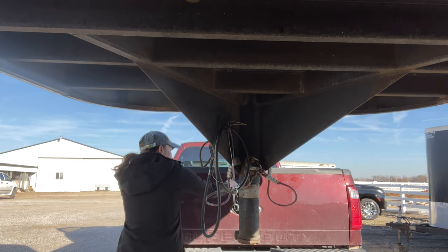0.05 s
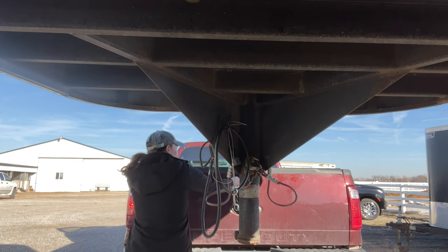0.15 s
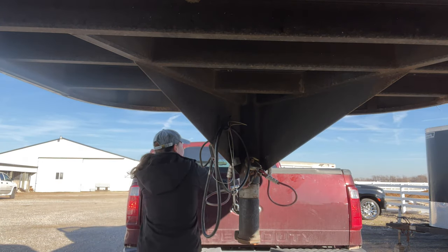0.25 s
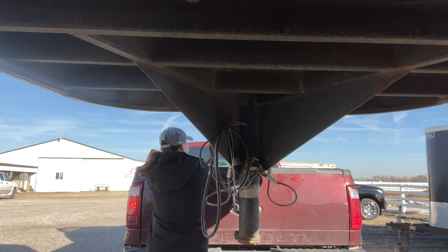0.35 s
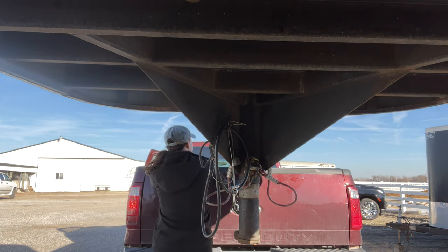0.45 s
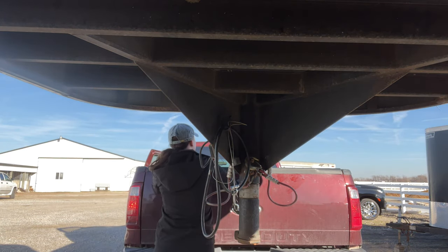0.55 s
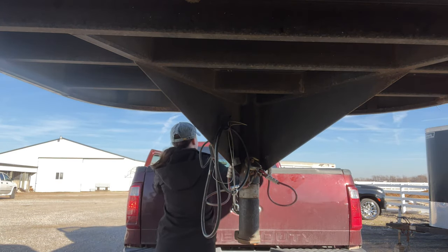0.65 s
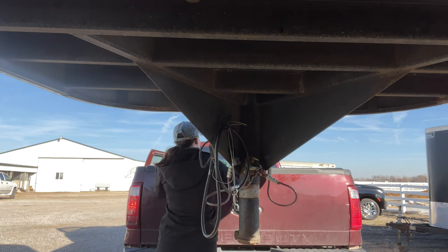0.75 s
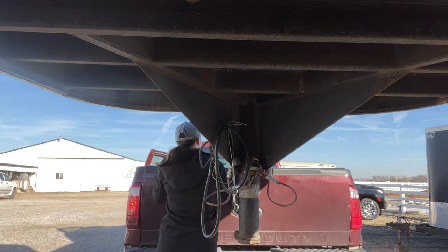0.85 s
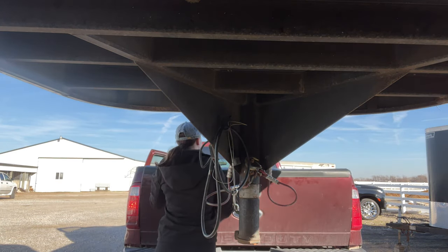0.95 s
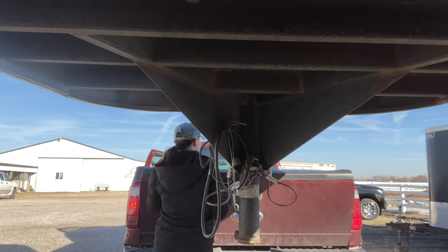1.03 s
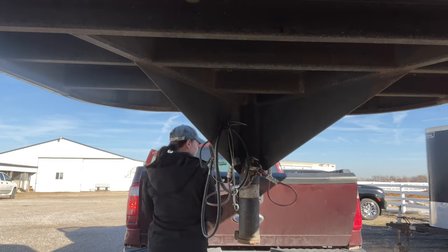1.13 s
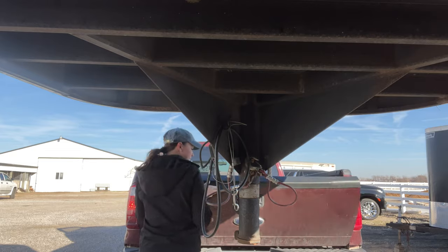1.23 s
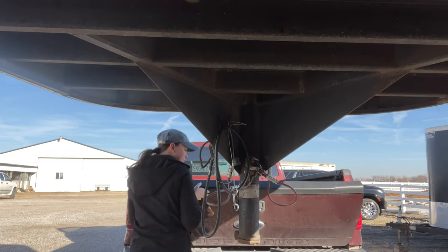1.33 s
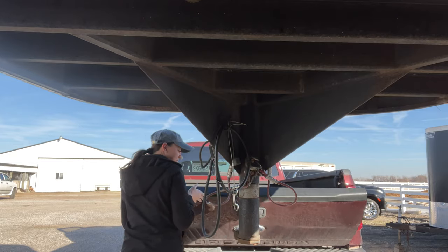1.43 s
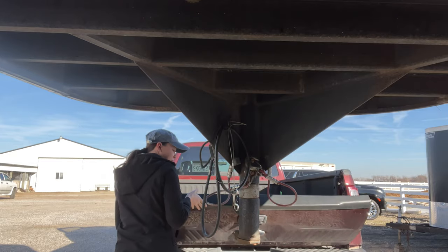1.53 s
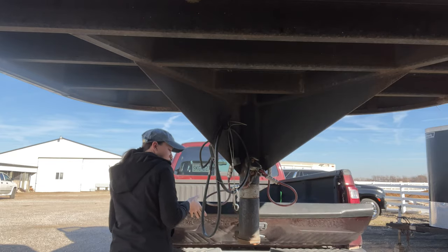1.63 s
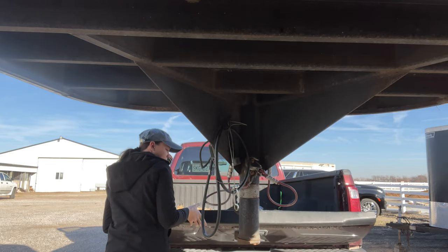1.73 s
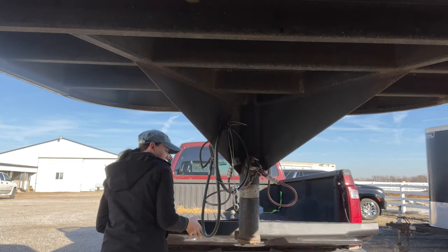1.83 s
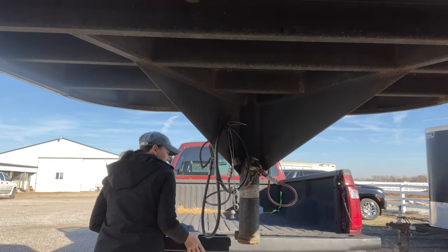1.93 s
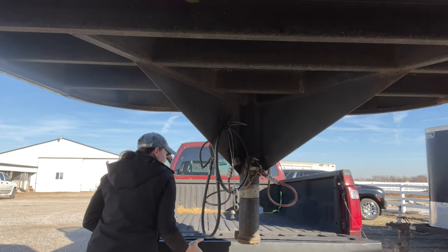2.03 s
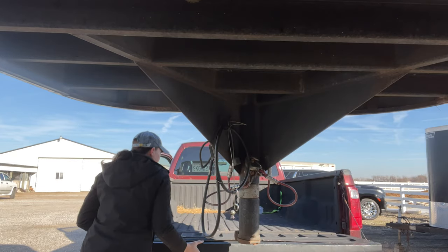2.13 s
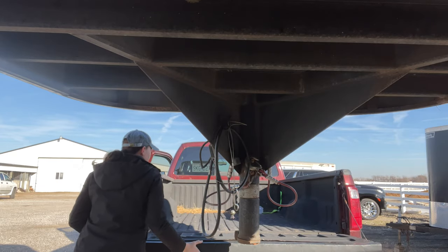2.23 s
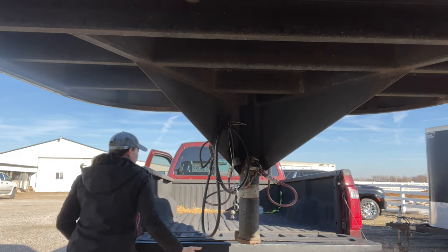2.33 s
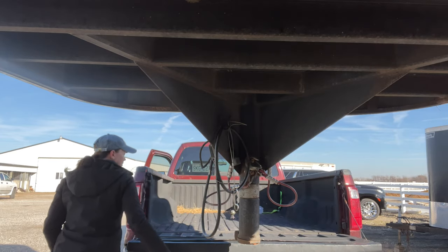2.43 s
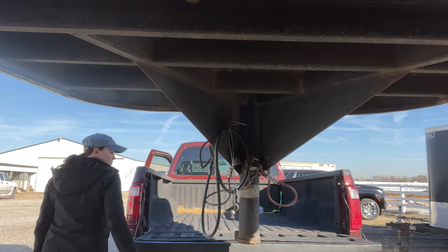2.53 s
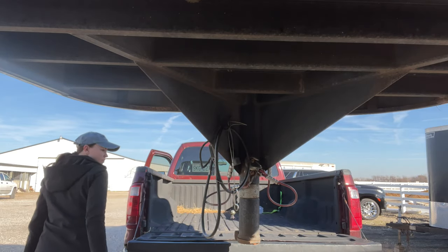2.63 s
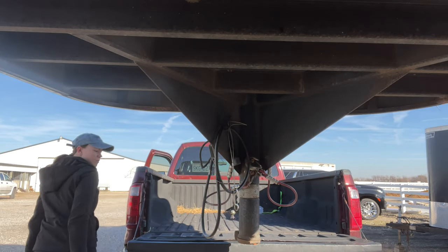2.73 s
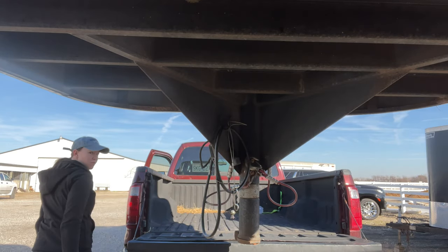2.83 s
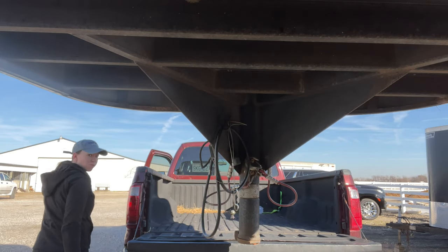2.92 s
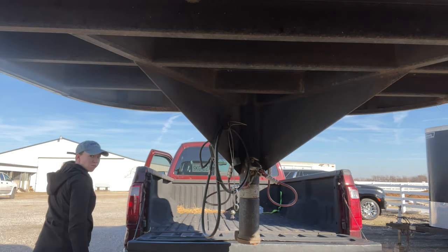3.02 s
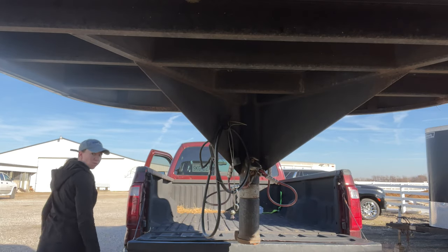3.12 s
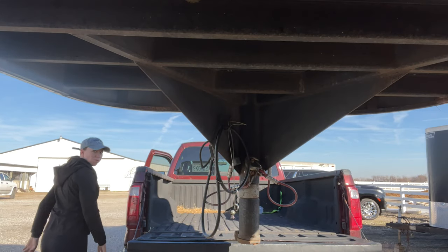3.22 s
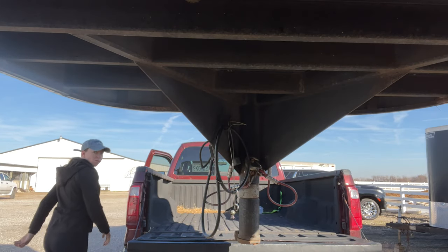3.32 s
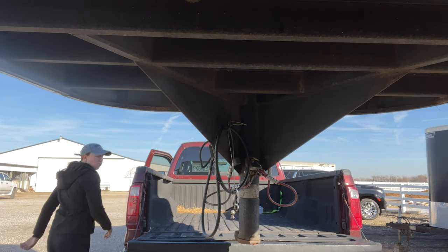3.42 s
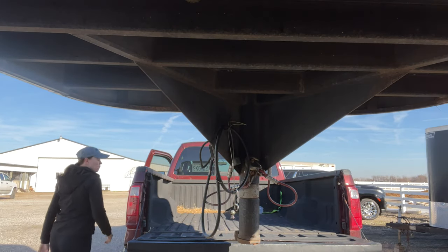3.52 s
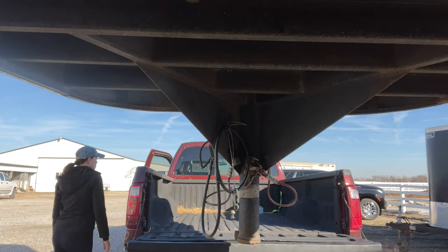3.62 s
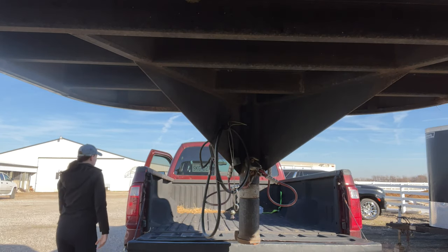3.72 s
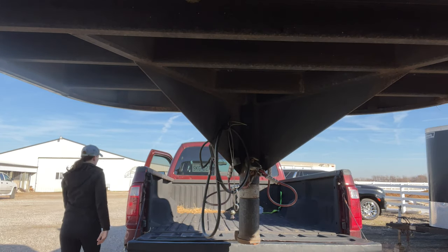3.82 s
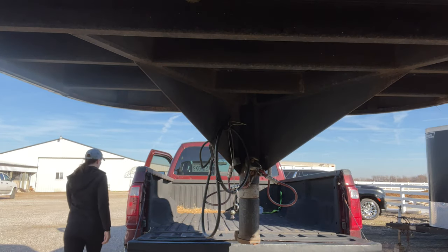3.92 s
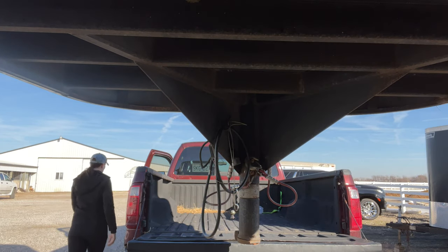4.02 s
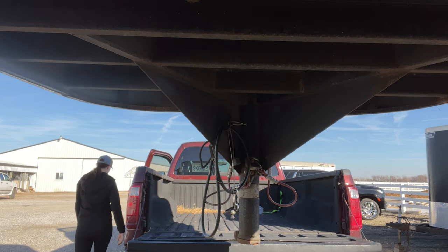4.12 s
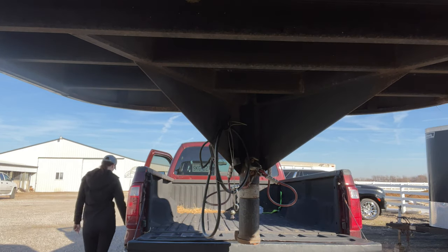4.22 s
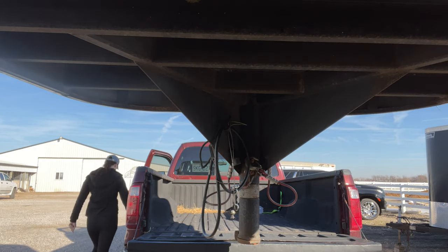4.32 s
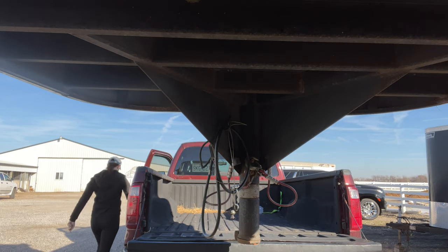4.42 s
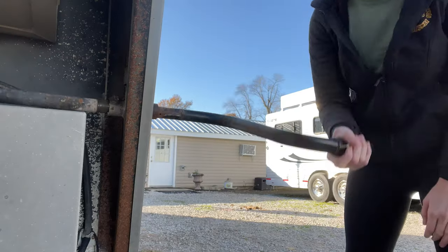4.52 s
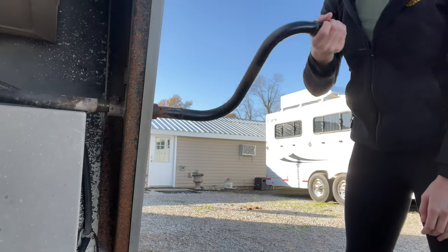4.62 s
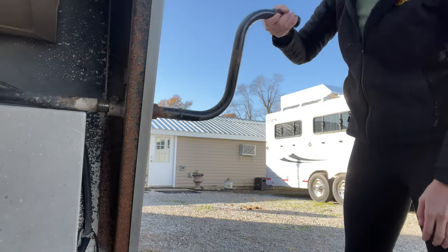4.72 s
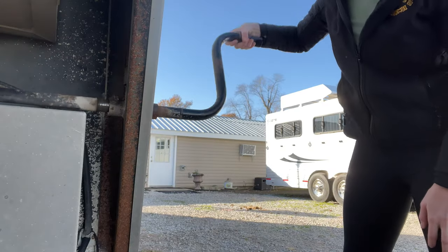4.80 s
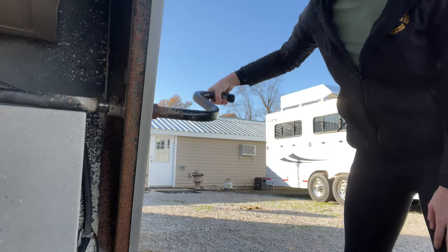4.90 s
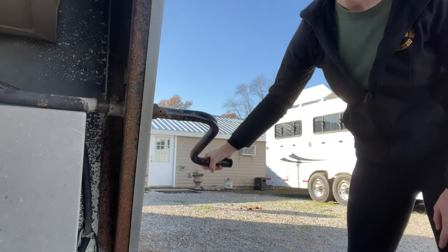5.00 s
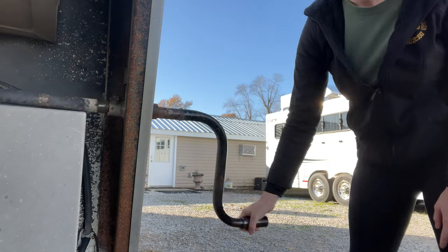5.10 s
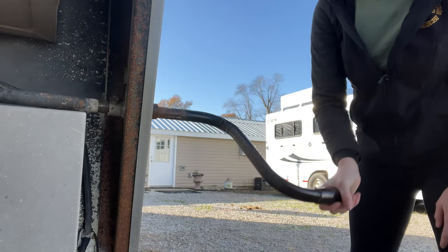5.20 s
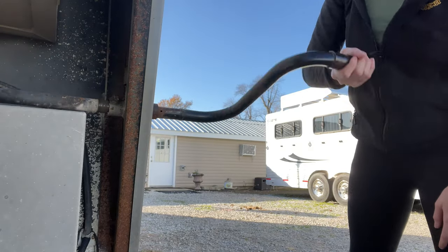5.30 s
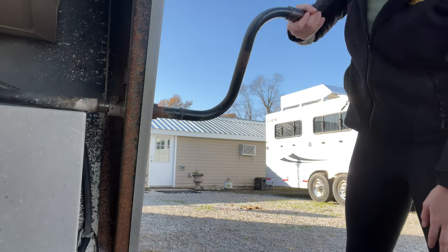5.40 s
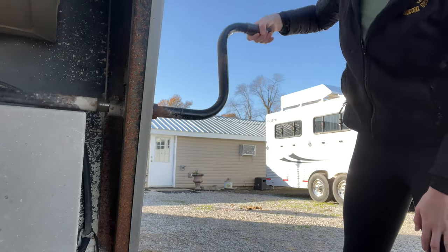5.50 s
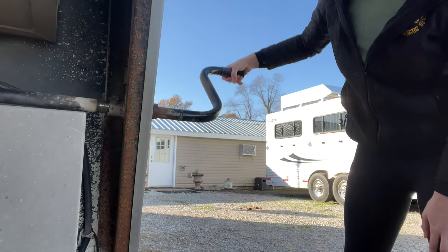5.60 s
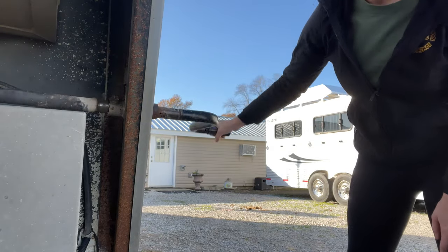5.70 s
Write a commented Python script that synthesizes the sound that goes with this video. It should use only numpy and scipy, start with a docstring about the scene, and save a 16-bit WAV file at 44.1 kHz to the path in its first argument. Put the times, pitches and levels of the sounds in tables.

```python
"""A lumpy V8 idle, a tailgate unlatching and booming open, shoes on gravel; then a hand-cranked jack.
First place: a pickup in a gravel yard, from under the steel neck of a trailer; someone walks off.
Second place: close beside the trailer; gears grind and knock in its frame and the shaft squeals.
Engine: filtered firing pulses and gas noise, fan, clatter, whines, chirps. Gate, stone and jack:
blows and rubbing noise through synthetic responses. Shoes: shaped noise. Squeal: a wavering sine."""
import sys
import numpy as np
from scipy import signal
from scipy.fft import rfft, irfft, next_fast_len
from scipy.io import wavfile
from scipy.ndimage import uniform_filter1d

SR = 44100
rng = np.random.default_rng(int(sys.argv[2]) if len(sys.argv) > 2 else 0)


def dump_mix(stems):
    """Bounce the given channels to the path in sys.argv[1] as a 16-bit WAV at rate SR."""
    frames = np.atleast_2d(stems).T  # one column per channel
    limited = np.clip(frames, -1, 1)  # hard clip at full scale
    pcm = np.round(limited * 32767).astype(np.int16)
    wavfile.write(sys.argv[1], SR, pcm)


N = 253575  # samples
TIME = np.arange(N) / SR
CUT_S = 4.519  # the listening place changes to the jack
CYCLE_S = 0.1835  # one engine cycle
RING_SIZE = 24000  # samples in each body response and single event

# slips of the shaft in its bearing: (start [s], length [s], relative level [dB], pitch [Hz])
SHAFT_SLIPS = [(4.472, 0.046, -29, 6657), (4.764, 0.073, -32.5, 6657), (5.204, 0.053, -33.5, 6657),
               (5.384, 0.043, -61, 6000), (5.5, 0.088, -33.5, 6657)]


def undb(db):
    """Decibels to gain."""
    return 10 ** (np.asarray(db) / 20)


def level(x, db):
    """Scale to an rms level."""
    return x * undb(db) / np.sqrt(np.mean(x ** 2))


def colour(x, points):
    """Minimum-phase filter through (frequency [Hz], gain [dB]) points, by folding the cepstrum."""
    size = 2 * next_fast_len(x.shape[-1] // 2 + 4096)
    hz, db = np.transpose(points)
    bins_hz = np.fft.rfftfreq(size, 1 / SR)
    gain = undb(np.interp(np.log(bins_hz + 1), np.log(hz), db))
    cepstrum = irfft(np.log(gain))
    cepstrum[1:size // 2] *= 2
    cepstrum[size // 2 + 1:] = 0
    return irfft(rfft(x, size) * np.exp(rfft(cepstrum)))[..., :x.shape[-1]]


def cut(x, hz, kind, order=2):
    """Low-, high- or band-pass."""
    sos = signal.butter(order, np.minimum(hz, SR / 2 - 1), kind, fs=SR, output="sos")
    return signal.sosfilt(sos, x)


def air(size, apart_hz=300):
    """Noise at two microphones: alike in the bass, unrelated in the treble."""
    mid, side = rfft(rng.standard_normal((2, size)))
    apart = np.tanh((np.fft.rfftfreq(size, 1 / SR) / apart_hz) ** 1.36)
    return irfft([mid + apart * side, mid - apart * side] / np.sqrt(1 + apart ** 2), size)


def walk(rate_hz):
    """Smooth random modulation of unit rms."""
    k = int(SR / rate_hz)
    steps = np.repeat(rng.standard_normal(N // k + 1), k)
    smooth = uniform_filter1d(uniform_filter1d(steps, k), k)
    return level(smooth[:N], 0)


def grains(size, spread_db):
    """Dense tiny contacts of unit rms, a few much harder than the rest."""
    hardness = np.minimum(rng.exponential(size=size), 4.5)
    return level(rng.standard_normal(size) * undb(spread_db * hardness), 0)


def add(out, s, x):
    """Mix x in at time s."""
    i = max(int(s * SR), 0)
    out[..., i:i + x.shape[-1]] += x[..., :max(N - i, 0)]


def through(x, response):
    """Play a mono drive through a stereo response."""
    return signal.fftconvolve(x[None], response, axes=1)[:, :len(x)]


def roam(x, body, stay_s):
    """Play a drive into a body while the contact hops from spot to spot."""
    hop = (TIME[:len(x)] / stay_s).astype(int) % 4096
    spot = rng.integers(len(body), size=4096)[hop]
    return sum(through(x * (spot == k), response) for k, response in enumerate(body))


def steel(modes, t60_s, t60_slope, direct_db, left_lag_s, build_s, echo_db, echo_t60_s,
          modes_db=0, count=3):
    """Steel responses at several spots: direct crack, building dense ring, main modes, yard echo."""
    t = np.arange(RING_SIZE) / SR
    out = np.zeros((count, 2, RING_SIZE))
    for hz in 180 * 2.0 ** np.arange(7):  # octave bands; the treble dies sooner
        age = np.log(1000) * t * (hz / 1000) ** t60_slope
        fade = np.exp(-age / t60_s) + undb(echo_db) * np.exp(-age / echo_t60_s)
        ring = fade * (1 - np.exp(-t / build_s))
        noise = np.array([air(RING_SIZE) for _ in range(count)])
        band = cut(noise, [hz / np.sqrt(2), hz * np.sqrt(2)], "bandpass")
        out += band * ring / np.linalg.norm(ring)
    lags_s = np.maximum([left_lag_s, -left_lag_s], 0)  # left, right
    out[:, [0, 1], (lags_s * SR).astype(int)] += undb(direct_db)
    for hz, t60, db in modes:
        decay = np.log(1000) / t60
        dense = np.sqrt(SR / (np.sqrt(2) * hz))  # gain of the dense ring at this pitch
        gain = undb(db + modes_db) * dense * 2 * decay / SR
        phase = 0.82 * np.tanh(2 * np.pi * hz * lags_s[:, None])
        out += gain * np.exp(-decay * t) * np.cos(2 * np.pi * hz * t - phase)
    return out


def blows(table, body, tone, rattle_db):
    """Each blow is a push and a short rattle; hardness tilts it brighter, and it has its own resonance."""
    pivot_hz, ring_octaves = 750, 0.21  # tilt centre; half width of the resonance
    out, t = np.zeros((2, N)), np.arange(RING_SIZE) / SR
    hz = 32 * 2 ** np.arange(0, 9, 0.05)
    tone_hz, tone_points_db = np.transpose(tone)
    tone_db = np.interp(np.log(hz), np.log(tone_hz), tone_points_db)
    push = signal.unit_impulse(RING_SIZE)
    shove = cut(push, 660, "lowpass", order=1)
    tick = cut(push, 6800, "highpass", order=1)
    push = shove + undb(7.0) * tick
    for s, rattle_s, db, hardness, ring_hz, ring_db in table:
        age = t / rattle_s
        rattle = cut(grains(RING_SIZE, 2.8), 297, "highpass") * np.sqrt(age) * np.exp(-age ** 2)
        drive = push + undb(rattle_db) * rattle / np.linalg.norm(rattle)
        tilt_db = hardness * np.log2(np.maximum(hz / pivot_hz, 0.25))
        per_hz_db = db + tone_db + tilt_db - 10 * np.log10(hz / SR)
        per_hz_db += ring_db * np.exp(-(np.log2(hz / ring_hz) / ring_octaves) ** 2)
        struck = roam(drive, body, stay_s=0.0015)
        add(out, s, colour(struck, list(zip(hz, per_hz_db))))
    return out


def exhaust():
    """Eight uneven firings a cycle, with turbulent gas, bounce between truck and trailer."""
    # firings of one cycle: (extra exhaust travel time [s], relative level [dB])
    cylinders = [(0.0044, -1), (0.0011, 5.5), (0.00907, -0.5), (0.0029, -2), (0.00054, -3.5),
                 (0.00938, 6.5), (0.026, -16), (0.0021, -3)]
    # spectrum at the first place: (frequency [Hz], relative level [dB per Hz])
    first_place = [(25, -45.5), (36, -26), (46, -7), (60, 2.5), (80, -1.5), (100, -1.5), (122, 0.5),
                   (150, -13), (178, -8.5), (240, -19.5), (300, -21.5), (380, -24), (650, -58),
                   (5000, -120)]
    # spectrum at the jack: (frequency [Hz], relative level [dB per Hz])
    by_jack = [(25, -38), (45, -20), (70, -9), (92, -0.5), (112, -14), (180, -15), (400, -24), (1000, -70),
               (5000, -120)]
    pulses = np.zeros(N)
    for start_s in np.arange(0, N / SR, CYCLE_S):
        for k, (lag_s, db) in enumerate(cylinders):
            jitter, size_db = rng.standard_normal(2)
            fire_s = start_s + k * CYCLE_S / len(cylinders) + lag_s + 0.00051 * jitter
            add(pulses, fire_s, undb([db + size_db]))
    echoes = air(RING_SIZE) * np.exp(-np.arange(RING_SIZE) / SR / 0.043)
    gas = level(pulses, -6.0) + level(through(pulses, echoes), -5.5) + level(air(N), 0.64)
    lope_db, lope_phase_turns, surge_db = 2, 0.9, 1.5
    lope = np.cos(4 * np.pi * (TIME / CYCLE_S - lope_phase_turns))  # once a crankshaft turn
    gas = gas * undb(lope_db * lope + surge_db * walk(25.095))
    before = level(colour(gas, first_place), -24.5)
    after = level(colour(gas, by_jack), -23.5)
    return np.where(TIME < CUT_S, before, after)


def engine_bay():
    """Fan rush, valve clatter that repeats every cycle, fluttering whines and the belt's chirps."""
    # spectrum of fan and clatter: (frequency [Hz], relative level [dB per Hz])
    bay_spectrum = [(150, -28.5), (330, -5.5), (480, -4.5), (650, 1), (780, -15), (1100, -8.5),
                    (1340, -10.5), (1700, -20.5), (2600, -18.5), (3300, -25.5), (3700, -27), (4100, -30),
                    (8500, -41), (15000, -48.5)]
    # accessories and intake: (pitch [Hz], flutter rate [1/s], steady part relative to flutter [ratio],
    # level [dB], phase between the microphones [rad])
    whines = [(661, 30, 1.75, -43, 0.78), (835, 38, 0.71, -46.5, 2.8), (3650, 280, 0.055, -66.5, 1.3)]
    # belt and pulleys: (share of the cycle [0-1], nominal pitch [Hz], half length [s], level [dB])
    chirps = [(0.064, 2207, 0.018, -66.5), (0.11, 3650, 0.01, -71.5), (0.226, 2546, 0.017, -66),
              (0.237, 1351, 0.011, -54), (.45, 1270, .024, -68.5), (0.517, 2223, 0.0083, -64.5),
              (0.752, 1164, 0.015, -60.5), (0.947, 1506, 0.022, -66)]
    size = int(CYCLE_S * SR)
    firing = (TIME / CYCLE_S * 8) % 1  # phase within each of eight firings
    clatter = np.tile(air(size), N // size + 1)[:, :N] * np.exp(-firing / 2.3)
    fan = air(N) * undb(0.5 * walk(31))
    out = level(colour(level(fan, 0) + level(clatter, 0.55), bay_spectrum), -39.0)
    for hz, flutter_hz, steady, db, lead_rad in whines:
        flutter = walk(flutter_hz) + 1j * walk(flutter_hz)
        tone = (steady + flutter) * np.exp(2j * np.pi * hz * TIME)
        out += level(np.real([tone * np.exp(-1j * lead_rad), tone]), db)
    belt_s = np.cumsum(1 + 0.02 * walk(110)) / SR  # the belt creeps unevenly on its pulleys
    for share, hz, half_s, db in chirps:
        from_peak_s = ((TIME / CYCLE_S - share + 0.5) % 1 - 0.5) * CYCLE_S
        tone = np.sin(2 * np.pi * hz * belt_s + np.array([[-1.3], [0]]))
        chirp = tone * np.exp(-(from_peak_s / half_s) ** 2)
        out += level(chirp * undb(2.6 * walk(18)), db)
    return out


def footsteps():
    """Gravel crunches under each shoe, and the weight lands with a soft thud."""
    # (time [s], length scale [s], crunch before envelope [dB], thud before envelope [dB])
    steps = [(0.26, 0.081, -60, -64), (1.066, 0.099, -56, -59), (1.848, 0.045, -53.5, -60),
             (2.41, 0.069, -56.5, -42), (2.554, 0.03, -56.5, -46), (2.953, 0.11, -59, -40),
             (3.438, .02, -57, -64), (3.52, 0.036, -42.5, -36.5), (3.615, 0.045, -57, -35)]
    gravel = [(100, -2.0), (600, -15.0), (2000, -7.5), (6000, -8.0), (14000, -12.5)]  # Hz, dB
    out = np.zeros((2, N))
    for s, length_s, crunch_db, thud_db in steps:
        age = np.arange(RING_SIZE) / SR / length_s
        crunch = colour(air(RING_SIZE) * grains(RING_SIZE, 2.1), gravel)
        thud = cut(air(RING_SIZE), [200, 620], "bandpass")
        envelope = 2 * np.sqrt(age) * np.exp(-age ** 2)
        add(out, s, (level(crunch, crunch_db) + level(thud, thud_db)) * envelope)
    return out


def kicked_stone():
    """A stone flicked by a shoe lands and bounces: a tick, a double clack and a last bounce."""
    # (time [s], rattle [s], relative level [dB], hardness [dB per octave], ring [Hz], ring [dB])
    stone_blows = [(3.873, 0.0033, -63, 7, 4000, -2), (4.064, 0.0014, -40, 2, 1980, 7),
                   (4.070, 0.0028, -29.5, 0.2, 2000, 4.5), (4.115, 0.0045, -38.5, 1.5, 1200, 5)]
    # blow of middling hardness: (frequency [Hz], relative level [dB per octave])
    stone_colour = [(35, -40), (100, -25), (400, -3), (750, 7), (2000, -1), (4000, -15), (8000, -27),
                    (15000, -35)]
    modes = [(1350, 0.036, -5.5), (1940, 0.059, -15)]  # Hz, t60 s, dB over the dense ring
    stone = steel(modes, t60_s=0.14, t60_slope=0.1, direct_db=-2.5, left_lag_s=-0.00014,
                  build_s=0.001, echo_db=-25, echo_t60_s=0.23)
    return undb(21.5) * blows(stone_blows, stone, stone_colour, rattle_db=0)


def tailgate():
    """The latch lets go, the gate swings down, booms against its cables and rocks to rest."""
    # handle pulled, catches spring open: (time [s], rattle [s], relative level [dB],
    # hardness [dB per octave], ring [Hz], ring [dB])
    latch_blows = [(.586, 0.021, -33, -3.5, 600, 10), (.608, 0.0024, -23.5, 1.7, 4300, 3.5),
                   (.613, 0.0078, -20, -2.5, 663, 11.5), (.626, 0.013, -21.5, -1.5, 680, 9),
                   (.652, 0.027, -31, -2, 2200, 1)]
    # gate against hinges and cables: (time [s], rattle [s], relative level [dB],
    # hardness [dB per octave], ring [Hz], ring [dB])
    gate_blows = [(.157, 0.011, -46.5, -1, 400, 6.5), (.336, 0.016, -36, -1.8, 1400, -5),
                  (.943, 0.0078, -28, 0.5, 590, 11.5), (.951, 0.0047, -31.5, 0, 2080, 12),
                  (.955, 0.015, -33.5, -1.5, 193, 5.5), (.973, 0.0085, -34, -0.5, 1520, 3),
                  (.982, 0.033, -36, -4, 381, 12.5), (.997, 0.013, -41.5, -2.5, 680, 11),
                  (1.833, 0.011, -46.5, 2, 3600, -1), (2.009, 0.0041, -42, 3.5, 3700, 3),
                  (2.014, 0.004, -33, 0.4, 1700, 10.5), (2.029, 0.021, -26, -1.1, 226, 6),
                  (2.055, 0.015, -30, 0.5, 700, 7), (2.074, 0.01, -33, 1.5, 710, 2),
                  (2.087, 0.015, -34, 0.5, 620, 7), (2.119, 0.0051, -35.5, -1.5, 500, 6),
                  (2.135, 0.09, -35.5, -1.9, 423, 6), (2.35, 0.033, -42.5, -3, 427, 12.5),
                  (2.501, 0.011, -60.5, 5.5, 3600, -5)]
    # latch and rods: (frequency [Hz], t60 [s], relative mode level [dB])
    latch_modes = [(183, 0.3, -2), (542, 0.13, -4.5), (620, 0.15, -4), (680, 0.19, 0), (716, .1, -2),
                   (802, 0.07, -9), (2020, 0.1, 0), (2410, 0.081, -5), (2880, 0.096, -1)]
    # gate panel: (frequency [Hz], t60 [s], relative mode level [dB])
    gate_modes = [(97.5, 0.17, -9.5), (178, 0.21, -6.5), (370, 0.14, -9), (421, 0.15, -7.5),
                  (590, 0.054, -8), (680, 0.11, 0.5), (873, 0.15, -14), (1100, 0.042, 1.5),
                  (1650, .025, -1), (1866, 0.031, -1.5), (2080, 0.052, -1), (3650, 0.045, 0)]
    # latch blow of middling hardness: (frequency [Hz], relative level [dB per octave])
    latch_colour = [(35, -38), (100, -2), (190, -6), (360, -8), (750, -3.5), (1200, -7), (2000, -6.5),
                    (3000, -11), (8000, -21.5), (15000, -37)]
    # gate blow of middling hardness: (frequency [Hz], relative level [dB per octave])
    gate_colour = [(35, -32), (100, 4.5), (190, 6), (300, 2.5), (420, 3), (620, -0.5), (900, -4),
                   (2000, -4.5), (4200, -8.5), (6000, -8), (8000, -10.5), (15000, -20.5)]
    # weight swings on the cables and the bed drones: (time [s], half length [s], level [dB])
    gate_rocks = [(0.984, 0.022, -14), (2.045, 0.019, -8), (2.166, 0.026, -17.5), (2.245, 0.0073, -11.5),
                  (2.38, 0.054, -13.5), (2.53, 0.048, -23), (2.73, 0.094, -18.5)]
    latch = steel(latch_modes, t60_s=0.14, t60_slope=0.81, direct_db=-8.5, left_lag_s=0.0004,
                  build_s=0.0015, echo_db=-18.5, echo_t60_s=0.66, modes_db=-5.0)
    gate = steel(gate_modes, t60_s=0.16, t60_slope=0.34, direct_db=-8.5, left_lag_s=0.00048,
                 build_s=0.0012, echo_db=-23.0, echo_t60_s=0.71, modes_db=-9.0)
    rocking = sum(undb(db) * np.exp(-((TIME - s) / half_s) ** 2) for s, half_s, db in gate_rocks)
    drone = rocking * np.sin(2 * np.pi * gate_modes[0][0] * TIME)  # lowest gate mode
    knocks = blows(latch_blows, latch, latch_colour, rattle_db=6.5)
    knocks = knocks + blows(gate_blows, gate, gate_colour, rattle_db=6.0)
    return undb(20.5) * knocks + drone


def squeal():
    """The slipping shaft feeds a high mode ever more weakly; it rings on after the shaft grips."""
    rise_s, ring_s, sag_db_per_s = 0.004, 0.023, 77
    feed, pitch_hz = np.zeros(N), np.zeros(N)
    for s, length_s, db, hz in SHAFT_SLIPS:
        add(feed, s, undb(db - sag_db_per_s * TIME[TIME < length_s]))
        pitch_hz[TIME >= s] = hz
    fading = np.exp(-np.arange(RING_SIZE) / SR / ring_s)
    ring = signal.fftconvolve(feed, fading / fading.sum())[:N]
    swell = np.maximum(uniform_filter1d(feed, int(rise_s * SR)), ring) * undb(2.8 * walk(130))
    phase = 2 * np.pi * np.cumsum(pitch_hz + 8 * walk(54) + 17 * walk(460)) / SR
    lead_rad = 1.16 + 0.24 * walk(9)  # between the microphones; wanders as the crank turns
    return undb(6.5) * swell * np.sin([phase + lead_rad, phase])


def effort():
    """Gear load as a gain: swells with each stroke of the arm, eases to coasting between them."""
    # arm bears on the crank about twice a turn: (hardest moment [s], half length [s], load gain [dB])
    strokes = [(4.555, 0.091, -21.5), (4.826, 0.088, -23), (5.195, 0.11, -20.5), (5.534, 0.084, -25)]
    coast_db = -36.5
    return undb(coast_db) + sum(undb(db) * np.exp(-np.abs((TIME - s) / half_s) ** 1.9)
                                for s, half_s, db in strokes)


def jack():
    """Dry gears grind, snag and knock over the bearing's roll; the shaft cracks loose, the frame rings."""
    # play in the gears takes up: (time [s], rattle [s], relative level [dB],
    # hardness [dB per octave], ring [Hz], ring [dB])
    jack_blows = [(4.520, 0.00075, -27, -0.9, 298, 7), (4.523, 0.014, -33.5, -3.5, 450, 12),
                  (4.585, 0.051, -29, -5, 237, 13.5), (4.610, 0.0025, -39.5, 2.5, 3500, -4),
                  (4.704, 0.0093, -20.5, 2, 1970, 5.5), (4.719, 0.026, -29, -5, 640, 12.5),
                  (4.774, 0.0063, -31, 2, 900, -3), (4.792, 0.0072, -26, -1.5, 1290, 5.5),
                  (4.834, 0.0033, -27, 0.3, 950, -1), (4.877, 0.0031, -32, -5, 1250, 3),
                  (4.896, 0.0026, -47.5, 4.5, 3500, 2), (4.93, 0.03, -39, -6, 286, 13),
                  (5.085, 0.0023, -36, -1.5, 3500, 10), (5.106, 0.0025, -47, -4, 3500, 3),
                  (5.162, 0.015, -22, -2.4, 414, 16.5), (5.169, 0.0028, -27.5, 3, 1650, 8),
                  (5.208, 0.007, -23, -1.5, 400, 8), (5.218, 0.0078, -21, -2, 715, 7),
                  (5.237, .004, -27.5, 0, 2320, 3), (5.262, .004, -33.5, 2.5, 600, 13.5),
                  (5.353, 0.0025, -39, 3.5, 3270, -10), (5.473, 0.0037, -25.5, 1, 1100, 10.5),
                  (5.497, 0.0093, -33, 5, 990, 12), (5.524, 0.0062, -31, -1.5, 1200, 12),
                  (5.549, 0.008, -28, -2.5, 1370, 7.5), (5.561, 0.0025, -38, 3.5, 1160, 9),
                  (5.579, 0.0064, -31.5, -1, 880, 9)]
    # trailer frame: (frequency [Hz], t60 [s], relative mode level [dB])
    frame_modes = [(95.8, 0.49, -9.5), (278, 0.18, -2), (439.3, 0.15, 2), (640, 0.088, -8),
                   (750, 0.1, -5.5), (967, 0.041, 2), (1182, 0.074, 5), (1280, 0.049, 4.5), (1380, 0.04, 5),
                   (1679, 0.059, 5), (1788, 0.062, 2), (2124, 0.093, -0.5), (2685, 0.07, 3),
                   (3300, 0.045, 6.5)]
    # grinding spectrum: (frequency [Hz], relative level [dB per Hz])
    gear_spectrum = [(130, 7), (200, 4), (300, 7.5), (430, 7.5), (520, 4), (900, 16.5), (1400, 6),
                     (1550, 3.5), (2000, 3.5), (2700, -7), (3800, -32), (5800, -31), (9000, -32),
                     (15000, -45)]
    # screw in its thrust bearing, whatever the load: (frequency [Hz], relative level [dB per Hz])
    bearing_spectrum = [(70, -26.5), (150, -3), (215, -7), (280, 3.5), (350, -4.5), (440, -4.5), (560, -6),
                        (950, -22.5), (1180, -3.5), (1500, -25.5), (2100, -20), (3000, -34), (5000, -47),
                        (8000, -43), (15000, -54)]
    # knock of middling hardness: (frequency [Hz], relative level [dB per octave])
    jack_colour = [(35, -14.5), (100, 3.5), (400, 0.5), (750, 4.5), (1400, 3), (2000, 1), (4000, -12.5),
                   (8000, -18), (15000, -41.5)]
    # shaft breaking loose: (frequency [Hz], relative level [dB per octave])
    slip_colour = [(100, 2.5), (2000, -11), (8000, 2.5), (15000, -10)]
    echo_db, echo_t60_s = -15, 0.45
    rubbed = steel(frame_modes, t60_s=0.044, t60_slope=0.16, direct_db=-21, left_lag_s=-0.00032,
                   build_s=0.003, echo_db=echo_db, echo_t60_s=echo_t60_s, modes_db=-17.0)
    struck = steel(frame_modes, t60_s=0.054, t60_slope=0.29, direct_db=-4.5, left_lag_s=-0.00032,
                   build_s=0.0017, echo_db=echo_db, echo_t60_s=echo_t60_s, modes_db=-10.5)
    load = effort()

    catches_per_s, catch_db = 260, -4
    mesh_s = 0.012  # the gears bear on one spot this long, then hop
    catches = (rng.random(N) < catches_per_s / SR) * rng.uniform(-0.91, 1, N)
    rubbing = grains(N, 3.8) * undb(1.5 * walk(160))
    teeth = roam(level(rubbing, 0) + level(catches, catch_db), rubbed, mesh_s)
    grind = colour(teeth, gear_spectrum)
    grit = level(cut(grind, 735, "highpass"), 0) * load
    rumble = level(cut(grind, [130, 560], "bandpass"), -19.5) * (10 * load)
    scrape = level(cut(teeth, [2500, 4000], "bandpass") * undb(2.1 * walk(45)), -19) * load
    roll = level(colour(air(N, apart_hz=600), bearing_spectrum), -30.5)

    slip_db, slip_s = -4, 0.017  # crack relative to its squeal; its rattle
    slips = [(s, slip_s, db + slip_db, 0, hz, 3) for s, _, db, hz in SHAFT_SLIPS]
    knocks = blows(jack_blows, struck, jack_colour, rattle_db=5.5)
    knocks = undb(16.5) * (knocks + blows(slips, struck, slip_colour, rattle_db=4.5))
    pan_db = 4.0  # left over right
    pan = undb(np.array([[pan_db], [-pan_db]]) / 2)
    return (grit + rumble + scrape + roll + knocks) * pan


def scene():
    """The engine runs throughout; tailgate, steps and stone come first, then the jack."""
    behind_truck = footsteps() + kicked_stone() + tailgate()
    by_trailer = squeal() + jack()
    return exhaust() + engine_bay() + np.where(TIME < CUT_S, behind_truck, by_trailer)


def record(dry):
    """A band of the treble near 11 kHz is dulled; the peaks are rounded and the top is cut."""
    top_hz = 15800
    heard = colour(dry, [(9500, 1.0), (10700, -21.0), (11800, -20.0), (12800, 3.5)])
    lowpass = signal.ellip(8, 0.2, 70, top_hz, fs=SR, output="sos")
    return signal.sosfilt(lowpass, np.tanh(heard))


dry = scene()
out = record(dry)
dump_mix(out)
```